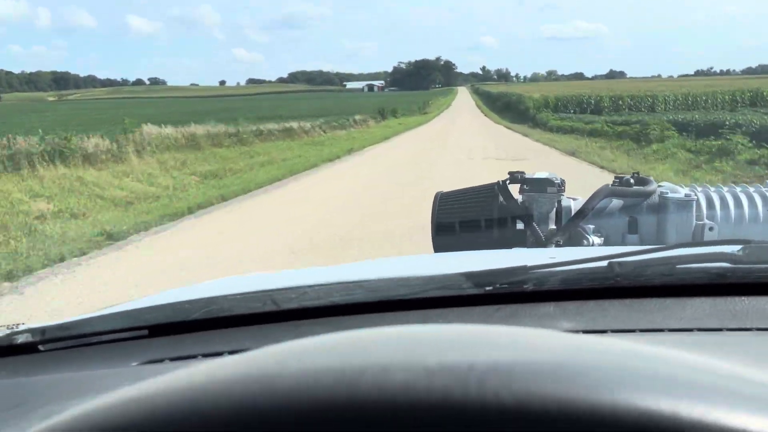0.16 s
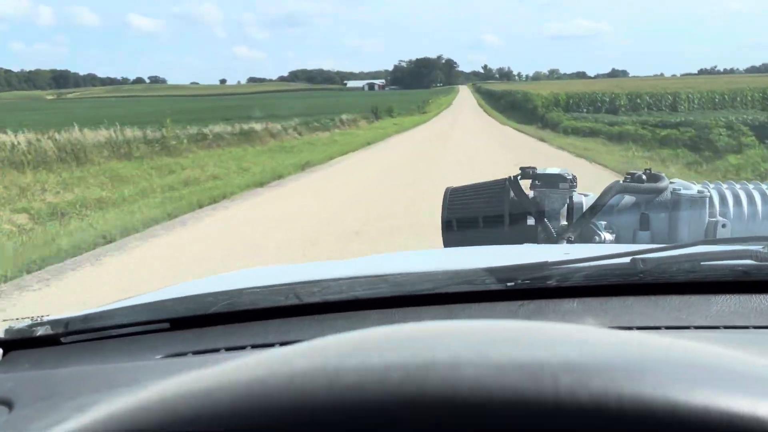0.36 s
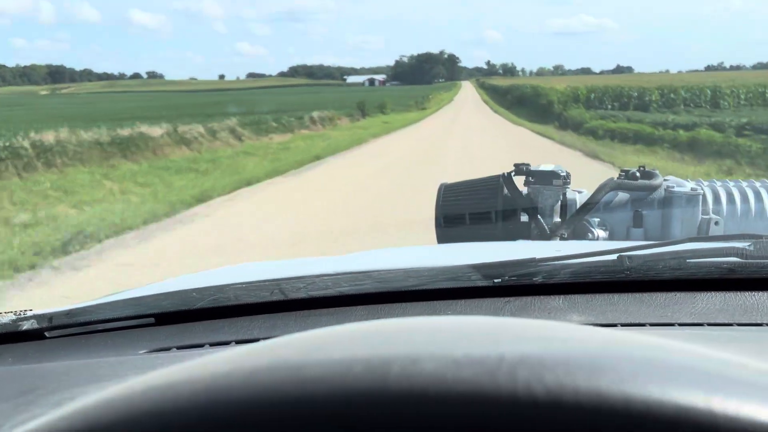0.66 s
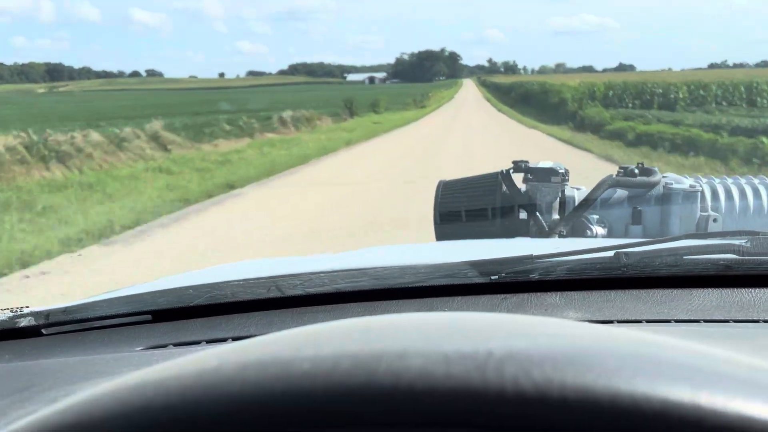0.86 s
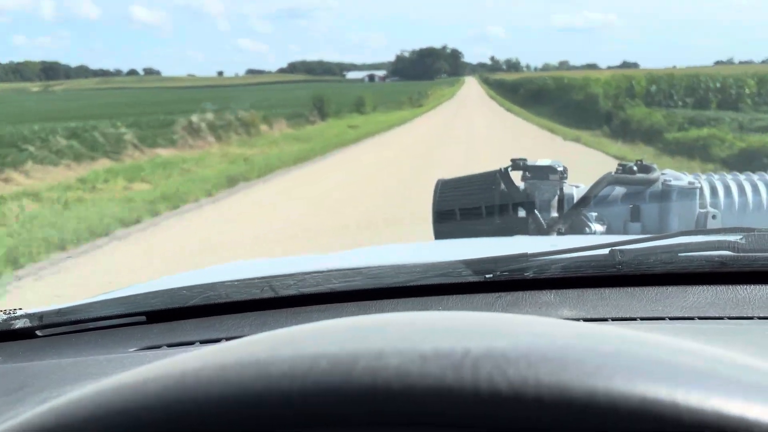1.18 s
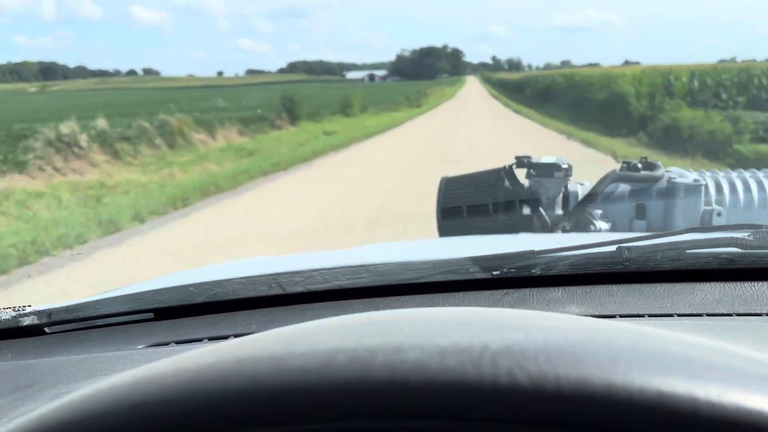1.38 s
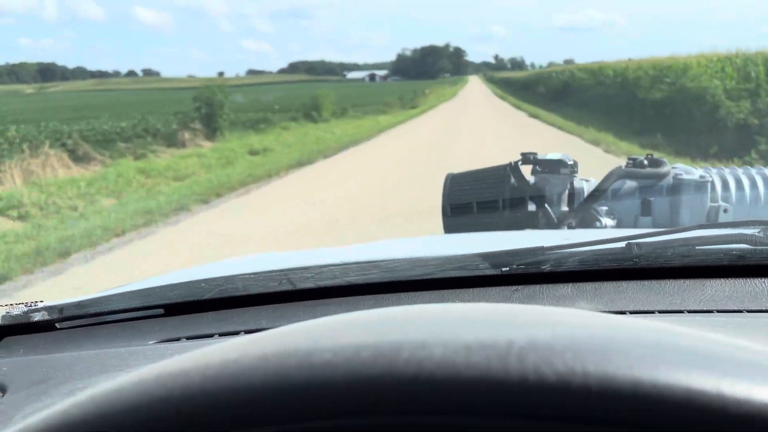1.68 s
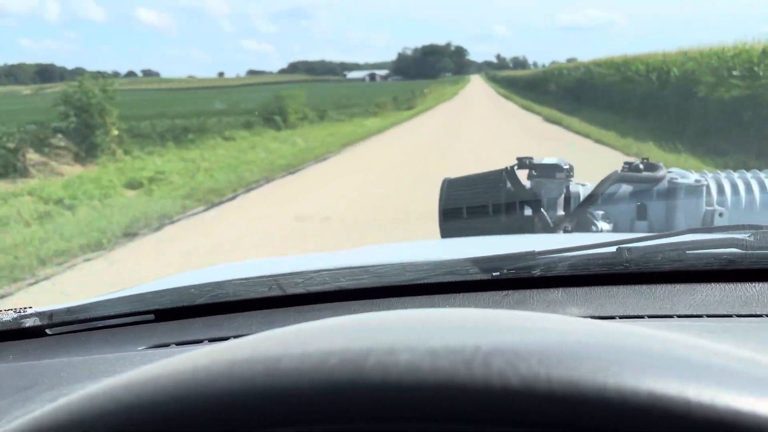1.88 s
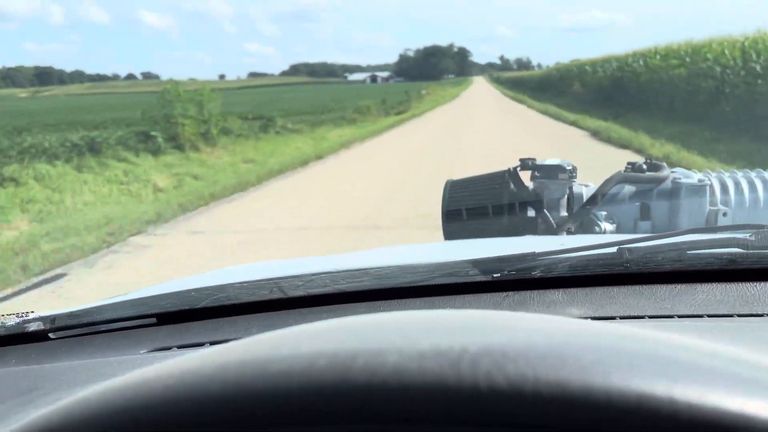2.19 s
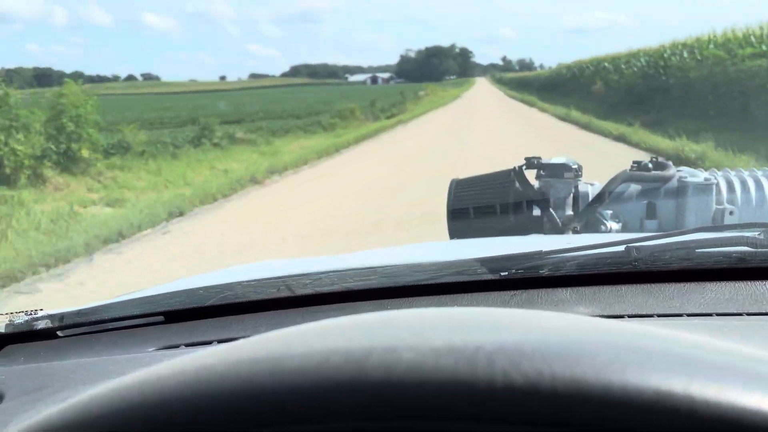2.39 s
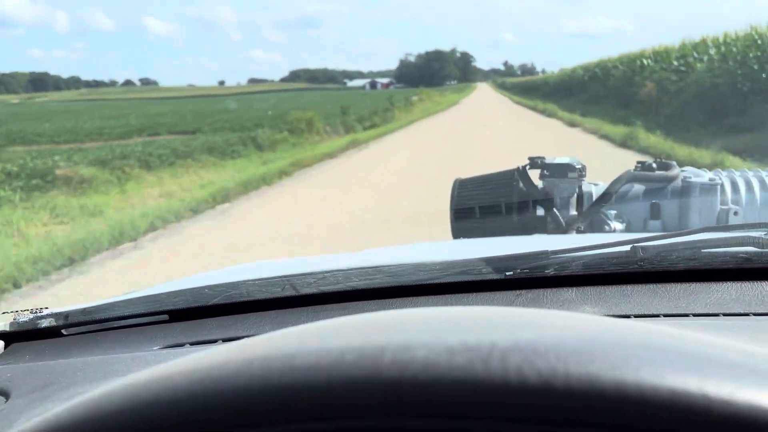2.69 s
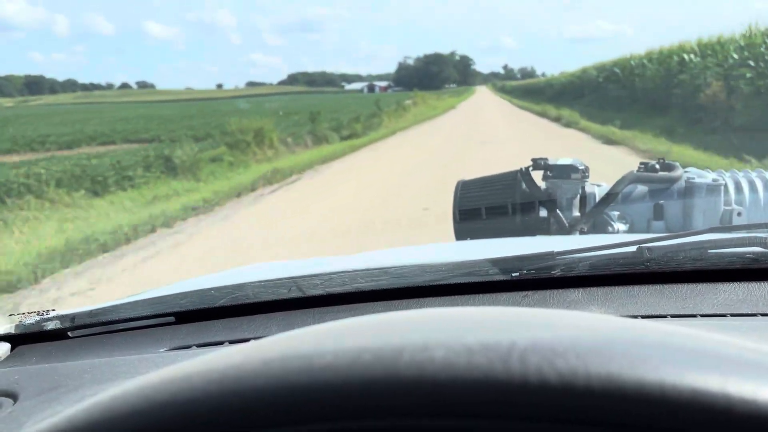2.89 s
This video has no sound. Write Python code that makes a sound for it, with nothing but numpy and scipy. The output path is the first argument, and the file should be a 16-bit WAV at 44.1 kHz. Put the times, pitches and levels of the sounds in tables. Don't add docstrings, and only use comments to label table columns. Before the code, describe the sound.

Inside a car on a country road, a low engine boom and clean high blower whine rise together with rushing intake air; after the lift, only descending engine hum, road rumble, faint wind and soft thuds remain.

```python
import sys
import numpy as np
from scipy import signal
from scipy.fft import rfft, irfft
from scipy.io import wavfile
from scipy.ndimage import uniform_filter1d

SR = 44100
rng = np.random.default_rng(int(sys.argv[2]) if len(sys.argv) > 2 else 0)


def linear_from_db(decibels):
    return 10 ** (np.asarray(decibels, float) / 20)


def int16_out(signal):
    q = np.round(np.clip(np.atleast_2d(signal).T, -1, 1) * 32767)
    wavfile.write(sys.argv[1], SR, q.astype(np.int16))


N = 134505

LIFT_S = 1.7455
AIR_FADE_S = 0.069


def level(x, db):
    return x * linear_from_db(db) / np.sqrt(np.mean(x ** 2))


def walk(rate):
    hold = int(SR / rate)
    steps = np.repeat(rng.standard_normal(N // hold + 1), hold)
    smooth = uniform_filter1d(uniform_filter1d(steps, hold), hold)
    return 1.135 * smooth[:N]


def falling(t, middle_s, fade_s):
    return 1 / (1 + np.exp(np.clip(4 * (t - middle_s) / fade_s, -40, 40)))


def pulse(t, middle_s, width_s):
    return np.exp(-((t - middle_s) / width_s) ** 2 / 2)


def partial(hz, db, pan_db, lead, flutter_db, rate, waver, slip=0):
    # f/Hz, width/Hz, gain left/dB, gain right/dB
    cabin = [(176, 10, 5.5, 5), (240.3, 12, 12.5, 7), (255.1, 23, -12.5, -9.5), (369, 13, 5, 3.5),
             (417.6, 6.6, 11, -3), (494, 9.7, -4.5, -4), (550, 7, 7, 3.5), (647, 15, 6, 6),
             (685, 7.7, 8.5, 8), (742, 14, 9, -0.5), (925, 57, -2, 1.5), (951.3, 62.5, 15.5, -0.5),
             (1001.7, 12, 8, 5), (1434, 34, 6, 9),
             (1498, 28, 13.5, 4), (1888, 77, 10.5, 8.5), (2319, 160, 8, 5), (2591, 32, 12.5, 7.5),
             (2784, 220, 5, 10.5), (2956, 100, 9, 8), (3454, 36, 11, -0.5), (3465, 31, -14.5, -9.5),
             (3737, 65, 9, 6.5), (3930, 22, -11, -10), (4210, 19, -9.5, -5), (4266, 48, 3.5, 4),
             (4965, 110, 10, 4.5), (5160, 120, 9.5, 8.5), (5480, 76, 19, 14),
             (198, 7.5, 1.5, 4), (780, 75, 5.5, 2.5), (514, 6.2, 10, 4), (3810, 20, -13, -6.5),
            (3930, 180, 6, 3.5), (2620, 17, -10, -6.5), (4190, 33, -9, -3.5), (4400, 110, -5, 1),
            (5100, 120, 14, 11.5), (6844, 140, 13.5, 9), (7540, 58, 15, 17.5),
             (220, 24, 3.5, 4), (537, 22, -1.5, -4), (403, 11, 1, 2), (959, 12, 2, 5.5),
                 (2290, 40, 5.5, 4.5), (2680, 45, 3.5, 2), (2990, 60, 3.5, 6.5), (3540, 37, 3, 2.5),
                 (3900, 40, 3, 3.5), (4237, 42, 7.5, 5.5), (4490, 50, 4, 3.5), (5000, 67, -3, -2.5),
                 (166.1, 11, 3, 4), (179.6, 6.5, -3.5, -3), (282, 14, 5, 4), (376.7, 11, 3.5, 4),
                 (934, 30, -3, -2.5), (2878, 26, -8, -8), (3450, 24, 5, 5), (3385, 67, 3, 4.5),
                 (4800, 50, -4.5, -5), (3820, 26, 4, 3.5)]
    cabin_db = 0
    for f, width, left, right in cabin:
        cabin_db = cabin_db + np.array([[left], [right]]) / (1 + (2 * (hz - f) / width) ** 2)
    turns = np.cumsum(hz) / SR + rng.random()
    phase = 2 * np.pi * turns + waver * walk(rate) + slip
    side = np.array([[.5], [-.5]])
    shared_db = db + flutter_db * walk(rate)
    side_db = side * (pan_db + flutter_db * walk(rate / 2))
    return linear_from_db(shared_db + cabin_db + side_db) * np.sqrt(2) * np.sin(phase + side * lead)


def air(table, db, swell_db, flicker_db):
    # f/Hz, left leads by/rad, left minus right/dB, unrelated share (0-1)
    port_rows = [(30, -.2, -.6, .08), (60, -.1, -1.5, .15), (170, -.1, -3.3, .15),
                 (325, -1.17, -2, .7), (1520, 4.5, -0.5, 0.88), (1890, 2.5, 1.5, 0.87),
                    (2700, 1.5, 4, 0.6), (4260, 0.87, 7, 0.7), (6500, 2.7, 1.5, 1),
                 (7600, 2.4, 0, .3), (8800, 3.2, 0, .08), (9800, 4.7, 0, .1), (11000, 6.15, 0, .04),
                 (12800, 6.45, 0, .04), (14200, 8.5, 0, .3), (15500, 9.4, 0, .05)]
    # f/Hz, width/Hz, gain/dB
    hollows = [(1370, 600, 0.5), (1720, 150, -2.5), (2500, 160, -5.5), (3500, 690, 1), (4250, 660, 3)]
    f = np.maximum(np.fft.rfftfreq(N, 1 / SR), 1)

    def at(rows, column):
        rows = np.array(rows)
        return np.interp(np.log(f), np.log(rows[:, 0]), rows[:, column])

    ports = port_rows
    common, left, right = rfft(rng.standard_normal((3, N)))
    own = np.clip(at(ports, 3), 0, 1)
    shared = np.sqrt(1 - own ** 2) * common
    tilt = linear_from_db(at(ports, 2) / 2) * np.exp(.5j * at(ports, 1))
    glass_db = sum(gain / (1 + (2 * (f - hz) / width) ** 2) for hz, width, gain in hollows)
    colour = linear_from_db(at(table, 1) + glass_db)
    pair = colour * np.array([(shared + own * left) * tilt, (shared + own * right) / tilt])

    out = 0
    swell = swell_db * walk(1.7)
    for octave in np.arange(np.log2(table[0][0]) - 1, np.log2(table[-1][0]) + 1):
        band = np.clip(1 - abs(np.log2(f) - octave), 0, 1)
        out = out + irfft(pair * band, N) * linear_from_db(swell + flicker_db * walk(8.93))
    return level(out, db)


def road():
    # f/Hz, level per Hz/dB
    rumble = [(15, -48), (32, -17), (75, -11), (112, -13), (146, -12.5), (392, -27), (587, -35),
              (1200, -37), (5260, -57.5), (6840, -84.5), (11600, -120)]
    return air(rumble, db=-27, swell_db=0.27, flicker_db=1.5)


def wind(t, throttle_db):
    # f/Hz, level per Hz/dB
    hiss = [(4500, -4.5), (5500, 1.5), (7000, 1.5), (8500, -7), (10000, -6), (12000, -9.5), (14000, -17),
            (16000, -19)]
    boost_db = 5 + throttle_db
    remaining = np.clip(1 - (t - LIFT_S) / AIR_FADE_S, 0, 1)
    return air(hiss, db=-60, swell_db=1.0, flicker_db=1.3) * linear_from_db(remaining * boost_db)


def bumps(t):
    # t/s, peak level/dB, f/Hz
    seams = [(0.131, -21, 51), (0.25, -20, 57.5), (0.326, -23, 55.7), (0.476, -29, 48.1),
             (0.585, -30.5, 57.3), (0.654, -27, 54.7), (0.727, -22.5, 45.5), (0.981, -19.5, 56.8),
             (1.052, -18.5, 56.52), (1.159, -24.5, 55.2), (1.264, -23.5, 52.72), (1.391, -28, 67.68),
             (1.453, -24, 64.72), (1.524, -27.5, 54), (1.644, -20, 58.55), (1.796, -14, 48.3),
             (1.874, -14, 50.2), (2.033, -20, 57.47), (2.092, -20.5, 67.6), (2.239, -17, 57.83),
             (2.328, -22.5, 55.92), (2.412, -26.5, 46.1), (2.492, -18.5, 66.93), (2.589, -23, 64.12),
             (2.696, -15.5, 61.3), (2.801, -25, 61.5), (2.978, -23, 60.8)]
    # t/s, peak level/dB, f/Hz
    knocks = [(.494, -32, 560), (1.382, -36, 600), (1.46, -35, 600), (1.513, -34, 600), (2.115, -42, 560),
              (2.529, -42, 600)]
    out = 0
    for s, db, hz in seams:
        phase = 2 * np.pi * rng.random()
        out = out + linear_from_db(db) * pulse(t, s, 0.016) * np.sin(2 * np.pi * hz * t + phase)
    for s, db, hz in knocks:
        out = out + linear_from_db(db) * pulse(t, s, 0.0026) * np.cos(2 * np.pi * hz * (t - s))
    return out * linear_from_db(np.array([[-.6], [.6]]))


def blower(t, lobe_hz, throttle_db):
    lobe_orders = [2, 3, 4, 5, 6, 7, 8, 9, 10, 11, 12, 13, 14, 17]
    # level/dB, left minus right/dB, left leads by/rad
    tones = [(-42.5, 1.5, 1.78), (-53.5, -1, 4.5), (-60, 9, 1.5), (-64.5, -1.5, -1.5), (-52, 6.5, 2.4),
             (-59, 6.5, 2), (-55, 3.5, 1.5), (-54, 6.5, 1.13), (-62.5, 5, 6), (-78.5, 5, 7),
             (-72.5, 3, -1.5), (-74.5, 4, 5), (-74, 5.5, -1.5), (-84.5, -5.5, 3)]
    # f/Hz, level per Hz/dB
    intake = [(180, -37), (300, -8.5), (405, -9), (514, -16), (893, -19), (983, -10.5), (1060, -18.5),
              (5260, -35), (6840, -71), (11600, -120)]
    whine_fade_s, early_s = .04, .002
    whine = 0
    for k, (db, pan_db, lead) in zip(lobe_orders, tones):
        tone = partial(k * lobe_hz, db, pan_db, lead,
                       flutter_db=0.97 + 0.27 * k, rate=24, waver=0.093 + 0.062 * k)
        whine = whine + falling(t, LIFT_S - early_s * k, whine_fade_s) * tone
    flow = np.exp(-np.maximum(t - LIFT_S + whine_fade_s / 2, 0) / AIR_FADE_S)
    rush = flow * air(intake, db=-39, swell_db=0.48, flicker_db=0.61)
    return linear_from_db(throttle_db) * (whine + rush)


def engine(t, firing_hz, power, throttle_db, boom_db):
    crank_orders = np.array([1, 2, 3, 4, 5, 6, 8, 9, 10, 12, 14, 15, 17, 18]) / 3
    # level under power/dB, level coasting/dB, left minus right/dB, left leads by/rad
    tones = [(-41, -40, -1, -4.5), (-38, -35.5, 1, -0.5), (-17, -15.5, -3.5, -0.6), (-34, -35.5, -2.5, 0),
             (-46.5, -42.5, 1.5, 1.1), (-34, -36.5, -2.5, 1.08), (-49, -50.5, 6, 1.5),
             (-38.5, -48.5, -7, 1), (-48, -55.5, 0, 1.5), (-41.5, -48, 1, -2), (-54, -52.5, 0.5, 2),
             (-49.5, -68, -4.5, 2), (-55.5, -62.5, 0.5, 2), (-51, -55.5, 5.5, -2.5)]
    # t/s, phase slip/rad, recovery/s, dip/dB
    stumbles = [
        (.052, -1.6, .15, -10),
        (1.792, 2.3, .06, -11),
    ]
    stumble_s = 0.0043
    slip = 0
    for s, rad, recovery_s, dip_db in stumbles:
        onset = 1 / (1 + np.exp(np.clip(-2 * (t - s) / stumble_s, -40, 40)))
        slip = slip + rad * onset * np.exp(-np.maximum(t - s, 0) / recovery_s)
        boom_db = boom_db + dip_db * pulse(t, s, stumble_s)
    out = 0
    for k, (on_db, off_db, pan_db, lead) in zip(crank_orders, tones):
        db = power * on_db + (1 - power) * off_db
        if k < 1.5:
            lead = -.12
        if k == 1:
            tone = partial(firing_hz, db + boom_db, pan_db, lead,
                           flutter_db=0.32, rate=22, waver=0.016, slip=slip)
        else:
            tone = partial(k * firing_hz, db + throttle_db / 2, pan_db, lead,
                           flutter_db=1.5, rate=22, waver=0.73)
        out = out + tone
    return out


def scene():
    # t/s, firing rate f/Hz, throttle level/dB, exhaust boom level/dB
    drive = [(0, 133.6, -3.5, 4.5), (.114, 133, 1, -7), (.18, 129.5, -2.5, 0.5), (.3, 119.5, -2.5, -3),
             (.35, 119.6, -3, -1), (.42, 123.2, -3, -2.5), (.54, 123.5, -1, -2), (.6, 125.4, -2, -1.5),
             (.7, 126.4, -2.5, -1), (1.1, 132.9, 0, 0.5), (1.7, 140.5, 1.5, 0.5), (1.77, 140.4, 5.5, 0),
             (1.9, 131.9, 5.5, -1), (2.24, 119, -10.5, -0.5), (2.5, 110.1, 4, 1), (2.62, 104.2, -1, 0),
             (2.86, 96.18, -7, -0.5), (3.05, 91, -4, 0)]
    t = np.arange(N) / SR
    times, *curves = np.array(drive).T
    firing_hz, throttle_db, boom_db = [uniform_filter1d(np.interp(t, times, c), size=1000) for c in curves]
    power = falling(t, LIFT_S, 0.015)
    lobe_hz = 3.553 * firing_hz
    background = road() + wind(t, throttle_db) + bumps(t)
    return background + blower(t, lobe_hz, throttle_db) + engine(t, firing_hz, power, throttle_db, boom_db)


def roll_off(x):
    return signal.sosfilt(signal.butter(12, 15750, fs=SR, output="sos"), x)


def record(dry):
    return roll_off(dry)


dry = scene()
out = record(dry)
int16_out(out)
```